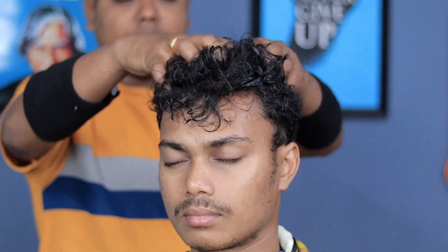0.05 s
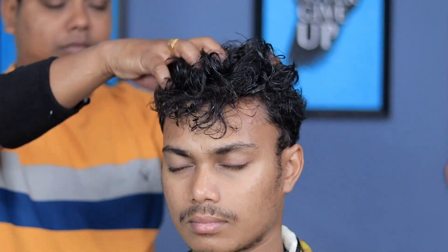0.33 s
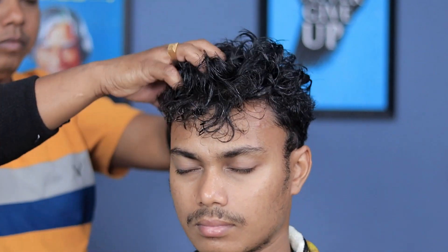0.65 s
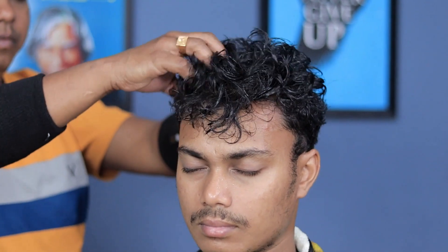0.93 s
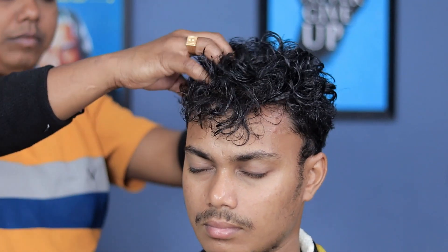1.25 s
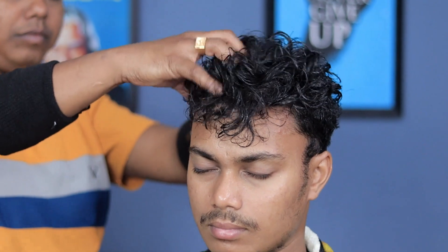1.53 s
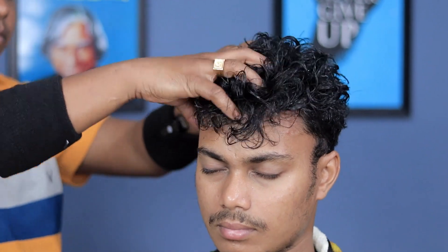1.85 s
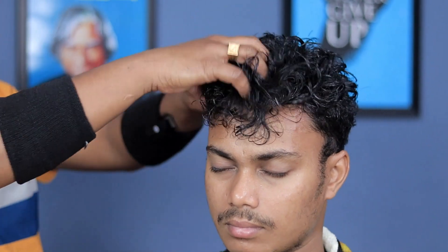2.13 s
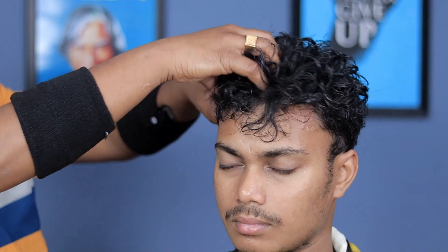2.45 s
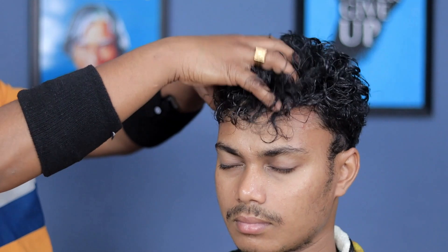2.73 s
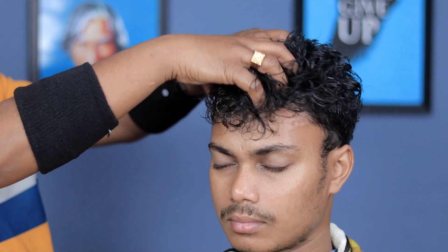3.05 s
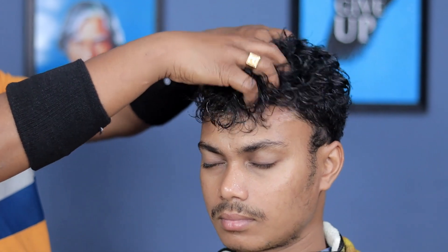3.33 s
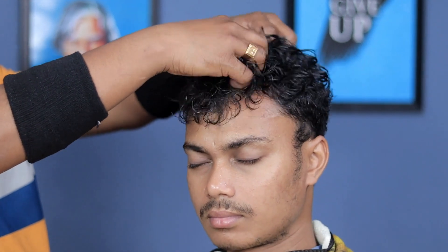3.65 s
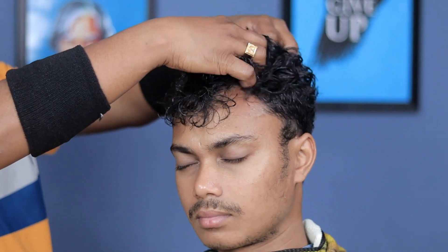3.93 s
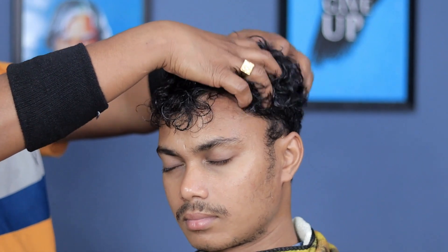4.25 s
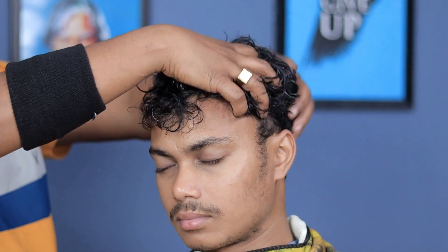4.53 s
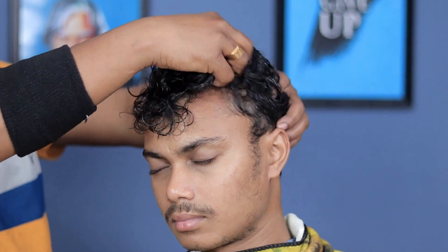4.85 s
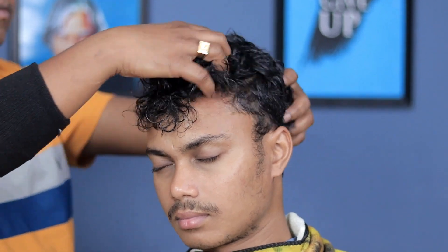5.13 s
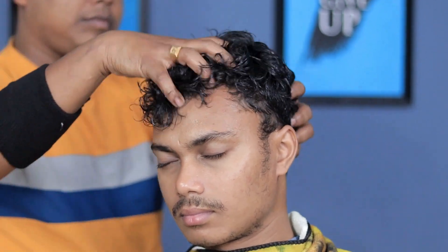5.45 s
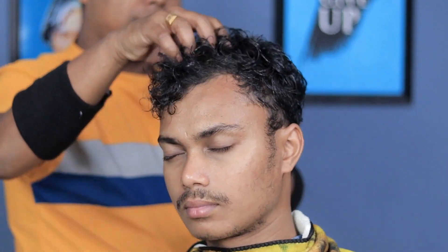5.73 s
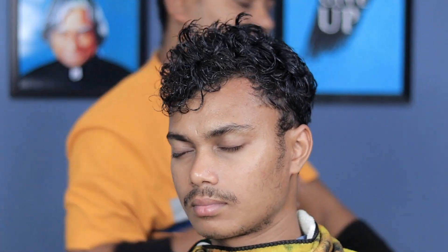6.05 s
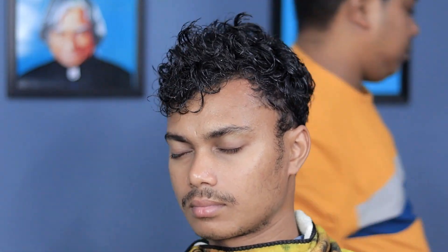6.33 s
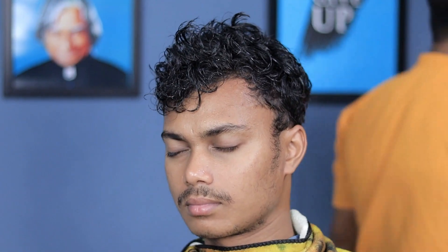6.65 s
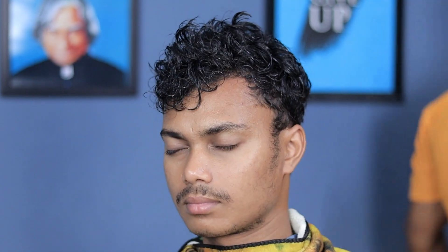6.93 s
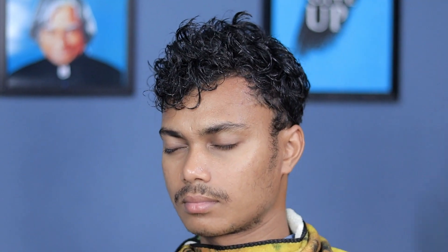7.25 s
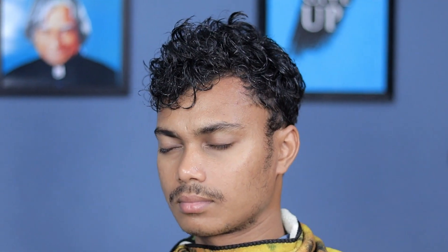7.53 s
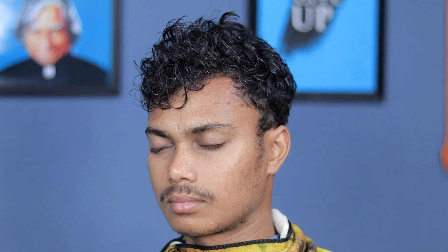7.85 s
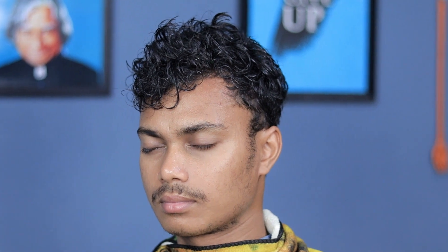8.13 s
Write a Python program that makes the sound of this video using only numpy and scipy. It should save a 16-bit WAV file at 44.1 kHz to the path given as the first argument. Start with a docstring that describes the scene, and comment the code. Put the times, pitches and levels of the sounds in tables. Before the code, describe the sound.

Fingers scratch rhythmically through thick hair, then scuffing sandals move off and a sharp knock on a counter is followed by metal clinks.

```python
"""Fingers scratch through thick hair, four strokes a second, close to a stereo microphone in a small room.
Each stroke snaps hundreds of hairs past the nails, rubs the scalp and bumps the skull. Then the masseur
walks off to one side with scuffing sandals and swishing clothes. Something knocks on a counter, which
rings and sets the room booming, and two metal tools clink in high modes."""
import sys
import numpy as np
from scipy import signal
from scipy.fft import rfft, irfft
from scipy.io import wavfile

SR = 44100
rng = np.random.default_rng(int(sys.argv[2]) if len(sys.argv) > 2 else 0)


def log_audio(samples):
    """Write samples as a 16-bit WAV file to the path given in sys.argv[1]."""
    # one column per channel
    frames = np.atleast_2d(samples).T
    # limit to full scale, then quantise
    limited = np.clip(frames, -1, 1)
    pcm = np.round(limited * 32767).astype(np.int16)
    wavfile.write(sys.argv[1], SR, pcm)


N = 370440

# Spectra. Each row: frequency in Hz, relative density in dB.
AIR_SPECTRUM = [(20, -38), (45, 1), (110, 4.5), (220, 2), (400, -3.5), (800, -5.5), (1600, -7),
                (4000, -9.5), (9000, -15), (15500, -17.5)]
CLOTH_SPECTRUM = [(60, -18), (200, -17.5), (400, -7.5), (700, -6.5), (880, -4), (1300, -4), (2000, -10),
                  (2800, -15), (3900, -12), (5500, -20.5), (9000, -30.5), (15000, -45)]
SCUFF_SPECTRUM = [(200, -25.5), (700, -25), (1400, -7.5), (2200, -4.5), (3000, 0.5), (4000, -1.5),
                  (5200, -2), (8000, -4), (12000, -12.5), (15500, -23)]
SLAP_SPECTRUM = [(200, -13), (500, -9.5), (950, 4.5), (1600, -20), (2800, -9), (4200, -0.5), (5300, 3.5),
                 (6800, -2), (8500, -17.5), (12000, -40)]
THUD_SPECTRUM = [(25, -27), (55, 1), (110, -3), (180, -5), (300, -40), (700, -44), (3000, -70)]
TICK_SPECTRUM = [(40, -45), (150, -6), (400, -6), (900, 0), (4200, -4), (7000, -1.5), (15500, -17)]
SLIDE_SPECTRUM = [(200, -23), (550, -1.5), (1400, 3.5), (1750, 2), (2300, 8), (3000, -9), (3700, 4),
                  (4600, 4.5), (5400, -14), (6400, -3), (7500, -46), (15000, -39)]
CRACK_SPECTRUM = [(40, -29), (130, -9), (230, -9), (500, 4), (900, -3.5), (1400, -3), (2900, -2.5),
                  (3700, -13.5), (4800, -17), (6500, -27.5), (11500, -37), (13500, -68)]
CLASH_SPECTRUM = [(40, -22), (170, -6), (350, 7), (600, 7), (1200, -2.5), (2500, -5.5), (4200, -5.5),
                  (5600, -13.5), (7500, -4.5), (10000, -13), (12500, -34), (15500, -31)]
SKULL_SPECTRUM = [(40, -14), (110, -25), (180, 0.5), (280, -12), (520, -9), (900, -8), (2500, -59)]
SCALP_SPECTRUM = [(60, -19), (200, -4.5), (450, -5.5), (800, -7.5), (1300, -1.5), (2500, 0), (3600, -4),
                  (6000, -5.5), (12000, -51)]
HAIR_SPECTRUM = [(300, -43), (1200, -51), (2200, -18.5), (3500, -6), (6000, -1.5), (8700, 0), (12000, -1.5),
                 (15500, -8)]

# Diffuse sound. Each row: frequency in Hz, channel correlation from 0 to 1.
COHERENCE = [(60, 1), (130, 0.91), (290, 0.61), (640, 0.42), (1400, 0)]
# Reverberation. Each row: frequency in Hz, T60 in seconds.
ROOM_T60 = [(100, 0.88), (400, 0.55), (1000, 0.64), (2800, 0.49), (7000, 0.32), (15000, 0.38)]
# Room tones. Each row: frequency in Hz, relative level in dB.
HUM_TONES = [(96.9, -85), (209.9, -84), (285.3, -85)]
ROOM_MODES = [(220.7, -59), (349.9, -47), (403.7, -43), (527.6, -49), (565.2, -46), (597.5, -57),
              (716.0, -53), (796.7, -49), (990.5, -54)]
# Ringing bodies. Each row: frequency in Hz, relative level in dB, T60 in seconds.
COUNTER_MODES = [(229, -3, 0.16), (395, 1, 0.12), (606, 7, 0.038), (750, 1, 0.073), (1070, -16, 0.015),
                 (1350, -4, 0.036), (1436, 11, 0.056), (1990, -18, 0.022), (2100, -17, 0.031),
                 (2770, 10, 0.028), (2860, -15, 0.49)]
LARGE_TOOL_MODES = [(3930, 1.5, 0.098), (4750, -7, .05), (6500, -24, 0.044), (6940, -13, 0.068),
                    (7100, -7, .05), (8430, 12.5, 0.032), (9400, -7, .04), (13490, -18, 0.054)]
SMALL_TOOL_MODES = [(9350, 3, 0.055), (9900, 10, 0.065), (10360, -5, .09), (10900, -12, .04),
                    (11540, 3, 0.093), (13520, -13, .08), (15500, -13, .09)]

# Contacts. Each row: peak time in seconds, relative level in dB, rise and fall in seconds, pan in dB.
# Pan is always left minus right.
CLOTH_SWISHES = [(.42, -70, 0.14, 0.3, -3), (6.42, -64.5, 0.27, 0.72, -1), (6.92, -61, 0.16, .15, -0.5),
                 (7.57, -60.5, 0.17, 0.17, -2)]
SOLE_SCUFFS = [(6.84, -36.5, 0.015, 0.031, -1), (6.866, -51, 0.021, .018, -5),
               (6.93, -47.5, 0.031, 0.032, -2), (7.58, -48, 0.02, 0.02, 0)]
SANDAL_SLAPS = [(6.346, -55, .001, 0.0051, 1), (6.3635, -37.5, 0.001, 0.0054, 0),
                (6.375, -47.5, 0.0043, 0.0039, 0), (6.413, -51, 0.0077, 0.014, 5)]
LOW_THUDS = [(6.39, -61.5, 0.053, 0.12, 2), (7.0, -63.5, 0.036, 0.059, -2), (7.78, -70, 0.23, 0.17, -1),
             (8.085, -60, 0.007, 0.12, 12)]
OBJECT_TICKS = [(7.572, -40, 0.0053, 0.0022, 0), (7.7465, -52, .0005, 0.0012, -5),
                (7.761, -47.5, 0.0041, 0.01, -11), (7.7638, -35.5, 0.00062, 0.002, -19)]
COUNTER_SLIDES = [(7.80, -53, 0.084, 0.04, -7), (7.855, -57.5, 0.043, 0.016, -15)]
COUNTER_KNOCKS = [(8.0492, -33, 0.0008, 0.014, -17), (8.0667, -11.5, 0.00024, 0.0061, -11),
                  (8.0719, -15.5, 0.001, 0.0023, -13)]
# Tools touching. Each row: the five contact columns, large and small tool's ring in dB.
TOOL_CLINKS = [(8.176, -54, .001, 0.0033, -8, -45, -63), (8.1928, -26, 0.0037, 0.01, -9, -33.5, -61),
               (8.213, -31, 0.0046, 0.029, -4.5, -61, -50), (8.244, -33.5, 0.0043, 0.01, -14, -38.5, -34.5),
               (8.263, -29, 0.0063, 0.0073, -3.5, -39.5, -42.5),
               (8.284, -38.5, 0.0058, 0.019, -8, -55, -60)]
# The other hand catching in the hair. Each row: the five contact columns, rasp level in dB.
OTHER_CATCHES = [(.228, -60, .008, 0.082, -7, -83), (.303, -58, 0.012, .035, 2, -87),
                 (3.75, -50.5, 0.0073, 0.037, 22, -85), (4.251, -55, .008, 0.068, 15, -83),
                 (4.873, -58, 0.042, 0.025, 8, -54.5), (5.086, -47, 0.01, 0.027, 8, -50),
                 (5.14, -56.5, 0.028, .045, 14, -58), (5.427, -52, .026, 0.031, 12, -59.5)]
# Movement. Each row: peak time in seconds, level in dB, rise and fall in seconds, band centre in Hz.
RUSTLES = [(.43, -65.5, 0.06, 0.054, 814), (6.4, -59.5, 0.077, 0.09, 902), (6.72, -70, 0.22, 0.12, 1306),
           (7.48, -66.5, 0.13, .12, 951)]

# Leading hand. Each row: peak time in seconds, hair level in dB, length in seconds.
HAND_STROKES = [(0.121, -50, 0.065), (0.371, -50.5, 0.084), (0.641, -53.5, 0.067), (.894, -43, .037),
                (1.14, -48.5, 0.056), (1.392, -46.5, 0.048), (1.636, -47, 0.042), (1.889, -45.5, 0.047),
                (2.132, -48, 0.055), (2.355, -42, 0.036), (2.598, -45.5, 0.052), (2.828, -41.5, 0.043),
                (3.058, -41.5, 0.042), (3.308, -53, .052), (3.569, -48, 0.044), (3.824, -40, .031),
                (4.068, -49, 0.048), (4.32, -54.5, 0.053), (4.567, -48.5, 0.069), (4.815, -42, 0.043),
                (5.032, -43, .043), (5.263, -62, 0.064), (5.491, -54, 0.053), (5.705, -43.5, 0.05),
                (5.919, -65, 0.092)]
# Stiff hairs. Each row: time in seconds, impulse level in dB, pan in dB.
HAIR_FLICKS = [(0.8894, -18, -5), (1.371, -25.5, -11), (1.637, -23.5, -5), (4.528, -29.5, 16)]
# Hand wandering. Each row: time in seconds, relative rub of a firm stroke, pan and treble tilt in dB.
HAND_CURVE = [(.1, -56.5, -10, -1), (1.4, -59, -9, 2), (2.4, -60.5, -8.5, -5), (3.05, -59, -6, -7),
              (3.8, -55, -0.5, -7.5), (4.07, -50.5, -1, -1), (4.35, -48, 0, -3), (4.57, -53, 1.5, -3),
              (4.82, -59, -10, -6.5), (5.1, -62.5, -11, -6.5), (5.5, -58, -9, -6), (5.7, -56.5, -10.5, 1.5),
              (5.92, -54.5, -10.5, -9)]
# Fingers sliding back. Each row: time in seconds, hair level in dB, delay after the stroke in seconds.
RETURN_CURVE = [(.1, -64.5, 0.12), (.5, -72, 0.15), (.9, -62.5, 0.093), (1.3, -74, .08), (1.65, -59, 0.068),
                (2.13, -55.5, 0.091), (2.65, -68.5, 0.13), (3.55, -61.5, 0.13), (4.4, -57, .11),
                (5.2, -73.5, .09), (5.7, -61, 0.052), (5.92, -82, .08)]
# Palm closing over the crown. Each row: time in seconds, rasp level in dB, resonance in Hz.
PALM_CURVE = [(3.3, -62, 1200), (3.82, -60.5, 1470), (4.3, -52, 1870), (4.6, -49.5, 2600),
              (4.82, -49.5, 2500), (5.04, -51.5, 2570)]
# Fingertips landing. Each row: time in seconds, bump level in dB.
BUMP_CURVE = [(.1, -70.5), (1.4, -72.5), (1.9, -64), (2.4, -74.5), (3.3, -65), (3.9, -68.5), (4.6, -69),
              (5.7, -82)]


def gain_of(db):
    """Decibels to amplitude."""
    return 10 ** (np.asarray(db) / 20)


def unit_rms(x):
    """Scales to rms 1."""
    return x / np.sqrt(np.mean(x ** 2) + 1e-20)


def noise():
    """Independent white noise in two channels."""
    return rng.standard_normal((2, N))


def at_hz(table, hz):
    """Interpolates a table over log frequency."""
    table_hz, value = np.transpose(table)
    return np.interp(np.log(hz + 1), np.log(table_hz + 1), value)


def at_time(curve, time_s):
    """Interpolates each column of a curve over time."""
    curve_s, *columns = np.transpose(curve)
    return [np.interp(time_s, curve_s, column) for column in columns]


def coloured(x, spectrum):
    """Zero-phase spectral shaping, at rms 1."""
    gain = gain_of(at_hz(spectrum, np.fft.rfftfreq(N, 1 / SR)))
    return unit_rms(irfft(rfft(x) * gain, N))


def filtered(x, spectrum):
    """Minimum-phase filter that keeps the power of white noise."""
    gain = unit_rms(gain_of(at_hz(spectrum, abs(np.fft.fftfreq(4096, 1 / SR)))))
    response = np.fft.ifft(np.exp(np.conj(signal.hilbert(np.log(gain))))).real
    return signal.oaconvolve(x, response[None], axes=1)[:, :N]


def swells(contacts):
    """Stereo envelope of contacts that build up and let go; powers add."""
    t, power = np.arange(N) / SR, np.zeros((2, N))
    for peak_s, db, rise_s, fall_s, pan_db in contacts:
        near = slice(max(int((peak_s - 5 * rise_s) * SR), 0), int((peak_s + 5 * fall_s) * SR))
        offset_s = t[near] - peak_s
        width_s = np.where(offset_s < 0, rise_s, fall_s) + 1e-6
        shape = np.exp(-2 * (abs(offset_s) / width_s) ** 1.5)
        left = 1 / (1 + gain_of(-pan_db) ** 2)
        power[:, near] += 2 * np.array([[left], [1 - left]]) * gain_of(db) ** 2 * shape
    return np.sqrt(power)


def snaps(per_s, spread_db, hiss):
    """Friction: tiny random snaps, unequal in the two channels, over sliding hiss."""
    size = gain_of(spread_db * np.minimum(rng.exponential(1, N), 4))
    clicks = size * (rng.random(N) < per_s / SR) * noise()
    clicks[0] = np.roll(clicks[0], 2)
    return unit_rms(unit_rms(clicks) + hiss * noise())


def patchy(x, depth_db, bins):
    """Lets the colour drift in random time-frequency patches."""
    frames = signal.stft(x, nperseg=256)[2]
    patch = np.outer(np.hanning(bins), np.hanning(2 * bins))
    drift = unit_rms(signal.oaconvolve(rng.standard_normal(frames.shape), patch[None], "same"))
    return unit_rms(signal.istft(frames * gain_of(depth_db * drift), nperseg=256)[1][:, :N])


def ring(x, modes):
    """Drives decaying modes of unit total energy, with random phases per channel."""
    t = np.arange(SR // 2) / SR
    body = sum(gain_of(db - 60 * t / t60_s) * np.sin(2 * np.pi * (hz * t + rng.random((2, 1))))
               for hz, db, t60_s in modes)
    return signal.fftconvolve(x, body / np.linalg.norm(body, axis=1, keepdims=True), axes=1)[:, :N]


def diffuse(x):
    """Sound from all sides is alike in both channels at long wavelengths only."""
    left, independent = rfft(x)
    coherence = at_hz(COHERENCE, np.fft.rfftfreq(x.shape[1], 1 / SR))
    right = coherence * left + np.sqrt(1 - coherence ** 2) * independent
    return irfft(np.array([left, right]), x.shape[1])


def room(x, gap_s=0.0046, crossfeed=0.5, echoes_per_s=5000):
    """Reflections after a short gap, mostly on the source's side; each band has its own decay."""
    taps = rng.standard_normal((2, SR)) * (rng.random((2, SR)) < echoes_per_s / SR)
    hz, t, frames = signal.stft(diffuse(taps), SR, nperseg=256)
    decay = gain_of(-60 * t / at_hz(ROOM_T60, hz)[:, None])
    tail = signal.istft(frames * decay, SR, nperseg=256)[1]
    tail *= np.arange(tail.shape[1]) > gap_s * SR
    mixed = (x + crossfeed * x[::-1]) / np.hypot(1, crossfeed)
    return signal.fftconvolve(mixed, tail / np.linalg.norm(tail[0]), axes=1)[:, :N]


def air(noise_db=-74, hum_gain_db=-2):
    """The quiet room: low rumble, hiss and a faint hum."""
    t = np.arange(N) / SR
    hum = sum(gain_of(db) * unit_rms(np.sin(2 * np.pi * (hz * t + rng.random()))) for hz, db in HUM_TONES)
    return gain_of(noise_db) * coloured(diffuse(noise()), AIR_SPECTRUM) + gain_of(hum_gain_db) * hum


def rustling(width_hz=290, climb_hz_per_s=750):
    """Movement rustles in a soft, narrow band that glides upward."""
    t, out = np.arange(N) / SR, np.zeros((2, N))
    baseband = signal.sosfilt(signal.butter(2, width_hz / 2, fs=SR, output="sos"), noise() + 1j * noise())
    for peak_s, db, rise_s, fall_s, centre_hz in RUSTLES:
        cycles = np.cumsum(centre_hz + climb_hz_per_s * (t - peak_s)) / SR
        band = unit_rms((baseband * np.exp(2j * np.pi * cycles)).real)
        out += band * swells([(peak_s, db, rise_s, fall_s, 0)])
    return out


def walking(feet_db=-2):
    """Soles slide and slap; clothes swish. Low thuds of the steps, then of the knock on the counter."""
    friction = coloured(snaps(per_s=9000, spread_db=4.5, hiss=1.2), SCUFF_SPECTRUM)
    feet = patchy(friction, depth_db=0, bins=8) * swells(SOLE_SCUFFS)
    feet += filtered(noise() * swells(SANDAL_SLAPS), SLAP_SPECTRUM)
    thuds = coloured(noise()[0] + 0.29 * noise(), THUD_SPECTRUM) * swells(LOW_THUDS)
    cloth = patchy(coloured(noise(), CLOTH_SPECTRUM), depth_db=1.3, bins=5) * swells(CLOTH_SWISHES)
    return gain_of(feet_db) * (feet + room(feet)) + thuds + cloth


def handling(room_db=-7):
    """A hand touches small things and slides one along the counter."""
    ticks = filtered(noise() * swells(OBJECT_TICKS), TICK_SPECTRUM)
    friction = coloured(snaps(per_s=1900, spread_db=-1, hiss=0.99), SLIDE_SPECTRUM)
    direct = ticks + friction * swells(COUNTER_SLIDES)
    return direct + gain_of(room_db) * room(direct)


def boom(left_db=7, right_db=9, build_s=0.01, t60_s=0.55):
    """The room's low modes swell after the hard blow and die slowly."""
    t = np.maximum(np.arange(N) / SR - COUNTER_KNOCKS[1][0], 0)
    tones = sum(gain_of(db) * np.sin(2 * np.pi * (hz * t + rng.random() + 0.23 * rng.random((2, 1))))
                for hz, db in ROOM_MODES)
    envelope = (1 - np.exp(-t / build_s)) * gain_of(-60 * t / t60_s)
    return gain_of([[left_db], [right_db]]) * envelope * tones


def knock(crack_db=-1, ring_db=-7, room_db=-6.5, band_hz=(150, 4500)):
    """A light touch, then a hard double blow: a short crack and the counter's modes."""
    force = swells(COUNTER_KNOCKS)
    peaks = np.round(np.transpose(COUNTER_KNOCKS)[0] * SR).astype(int)
    blows = np.zeros((2, N))
    blows[:, peaks] = force[:, peaks]
    blows *= np.linalg.norm(force) / np.linalg.norm(blows)
    # The panel radiates little bass; the contact is too soft for high treble.
    bandpass = signal.butter(3, band_hz, "bandpass", fs=SR, output="sos")
    body = signal.sosfilt(bandpass, ring(blows, COUNTER_MODES))
    crack = filtered(unit_rms(noise()[0] + 0.65 * noise()) * force, CRACK_SPECTRUM)
    direct = gain_of(crack_db) * crack + gain_of(ring_db) * body
    return direct + gain_of(room_db) * room(direct)


def clinks(clash_db=-5.5, room_db=-4, detune=0.0254):
    """Two metal tools chatter on each other and on the counter, and ring in high modes."""
    peak_s, db, rise_s, fall_s, pan_db, large_db, small_db = np.transpose(TOOL_CLINKS)
    chatter = snaps(per_s=4400, spread_db=3, hiss=0.43)
    clash = chatter * swells(zip(peak_s, db, rise_s, fall_s, pan_db))
    direct = gain_of(clash_db) * filtered(clash, CLASH_SPECTRUM)
    for tool_db, modes in (large_db, LARGE_TOOL_MODES), (small_db, SMALL_TOOL_MODES):
        # Pressed together, the tools give each mode two damped neighbours that beat with it.
        neighbours = [(hz * (1 + side * detune), mode_db - 6.5, t60_s / 2)
                      for hz, mode_db, t60_s in modes for side in (-1, 1)]
        drive = chatter * swells(zip(peak_s, tool_db, rise_s, fall_s, pan_db))
        direct += ring(drive, list(modes) + neighbours)
    return direct + gain_of(room_db) * room(direct)


def rise_and_fall(length_s, rise_share=0.54):
    """Splits a stroke into build-up and release."""
    return length_s * rise_share, length_s * (1 - rise_share)


def skull_bumps(edge_s=0.025):
    """The fingertips land on the skull with every stroke."""
    bumps = [(peak_s, *at_time(BUMP_CURVE, peak_s), edge_s, edge_s, 0) for peak_s, _, _ in HAND_STROKES]
    return coloured(noise()[0] + 0.5 * noise(), SKULL_SPECTRUM) * swells(bumps)


def hair_flicks():
    """A bent hair springs off a nail with one sharp click."""
    time_s, db, pan_db = np.transpose(HAIR_FLICKS)
    clicks = np.zeros((2, N))
    clicks[:, np.round(time_s * SR).astype(int)] = gain_of([db + pan_db / 2, db - pan_db / 2])
    return filtered(clicks, HAIR_SPECTRUM)


def palm_rasps(q=0.81, palm_pan_db=-12, drag_share=0.81, other_palm_hz=2140):
    """The hollow under each palm picks a rasping band out of the friction."""
    friction, out = snaps(per_s=3200, spread_db=2.5, hiss=0.63), np.zeros((2, N))
    rasps = [(peak_s, rasp_db, rise_s, fall_s, pan_db, other_palm_hz)
             for peak_s, _, rise_s, fall_s, pan_db, rasp_db in OTHER_CATCHES]
    for peak_s, _, length_s in HAND_STROKES:
        if PALM_CURVE[0][0] - length_s < peak_s < PALM_CURVE[-1][0] + length_s:
            rasp_db, hz = at_time(PALM_CURVE, peak_s)
            rasps.append((peak_s, rasp_db, *rise_and_fall(drag_share * length_s), palm_pan_db, hz))
    for *contact, hz in rasps:
        b, a = signal.iirpeak(hz, q, fs=SR)
        band = signal.lfilter(b, a, signal.lfilter(b, a, friction))
        out += unit_rms(band) * swells([contact])
    return out


def catching(depth_db=2.2, window_samples=500):
    """Locks catch on a nail and slip off, clumping the snaps over a few milliseconds."""
    drift = unit_rms(signal.oaconvolve(rng.standard_normal(N), np.hanning(window_samples), "same"))
    return unit_rms(gain_of(depth_db * drift))


def finger_contacts(firm_db=-45, rub_db_per_db=0.55, return_s=0.086, return_rub_db=-8.5,
                    return_pan_share=0.58, other_rub_db=-16.5, other_tilt_db=4):
    """Strokes, their light returns and the other hand's catches, joined column by column."""
    peak_s, db, length_s = np.transpose(HAND_STROKES)
    rub_db, pan_db, tilt_db = at_time(HAND_CURVE, peak_s)
    rub_db += rub_db_per_db * (db - firm_db)
    strokes = [peak_s, db, *rise_and_fall(length_s), rub_db, pan_db, tilt_db]
    back_db, delay_s = at_time(RETURN_CURVE, peak_s)
    returns = [peak_s + delay_s, back_db, *rise_and_fall(return_s),
               back_db + return_rub_db, return_pan_share * pan_db, tilt_db]
    peak_s, db, rise_s, fall_s, pan_db, _ = np.transpose(OTHER_CATCHES)
    catches = [peak_s, db, rise_s, fall_s, db + other_rub_db, pan_db, other_tilt_db]
    return np.hstack([np.broadcast_arrays(*kind) for kind in (strokes, returns, catches)])


def scratching(scalp_db=1.5, room_db=-9.5, split_hz=8000):
    """Hairs snap past the nails in a bright crackle; fingertips rub a duller sound from the scalp."""
    peak_s, db, rise_s, fall_s, rub_db, pan_db, tilt_db = finger_contacts()
    # The colour drifts as the fingers meet new locks.
    hair = coloured(snaps(per_s=5500, spread_db=0, hiss=0.86), HAIR_SPECTRUM)
    hair = patchy(hair, depth_db=1.8, bins=12) * catching()
    scalp = coloured(snaps(per_s=3000, spread_db=4, hiss=0.87), SCALP_SPECTRUM)
    scalp = gain_of(scalp_db) * patchy(scalp, depth_db=1.5, bins=8)
    # The crackle turns brighter or duller as the hand wanders.
    middle = signal.sosfilt(signal.butter(2, split_hz, fs=SR, output="sos"), hair)
    treble = hair - middle
    direct = middle * swells(zip(peak_s, db - tilt_db / 2, rise_s, fall_s, pan_db))
    direct += treble * swells(zip(peak_s, db + tilt_db / 2, rise_s, fall_s, pan_db))
    direct += scalp * swells(zip(peak_s, rub_db, rise_s, fall_s, 0.56 * pan_db - 0.5))
    direct += palm_rasps() + hair_flicks() + skull_bumps()
    return direct + gain_of(room_db) * room(direct)


def scene():
    """All sources at the microphone."""
    return scratching() + walking() + rustling() + handling() + knock() + boom() + clinks() + air()


def record(dry, cutoff_hz=15850):
    """The recorder's band limit."""
    lowpass = signal.firwin(511, cutoff_hz, window=("kaiser", 9), fs=SR)
    return signal.oaconvolve(dry, lowpass[None], "same")


dry = scene()
out = record(dry)
log_audio(out)
```